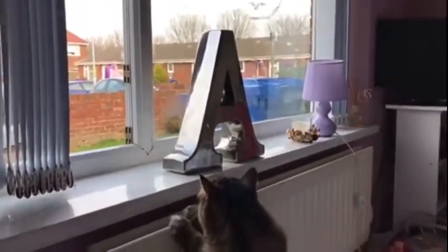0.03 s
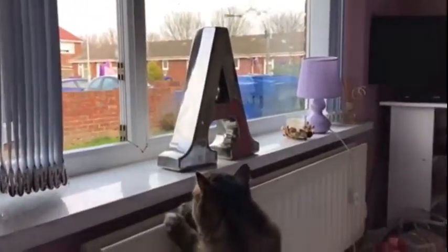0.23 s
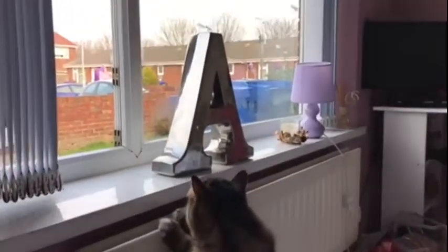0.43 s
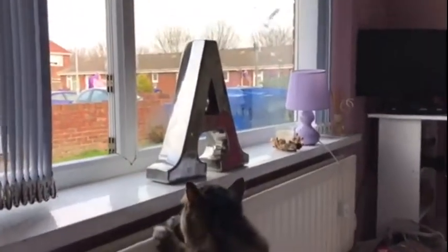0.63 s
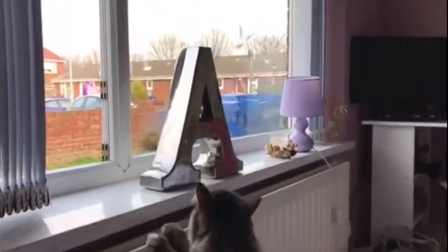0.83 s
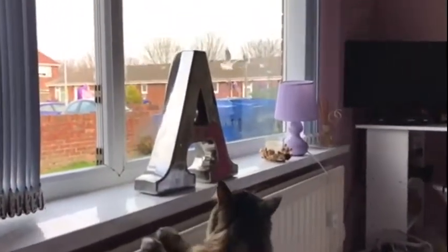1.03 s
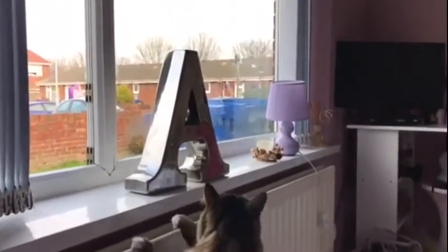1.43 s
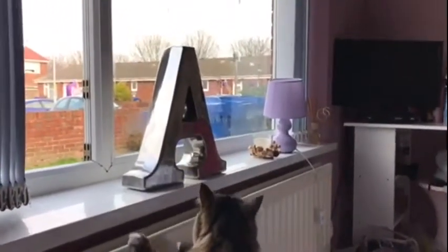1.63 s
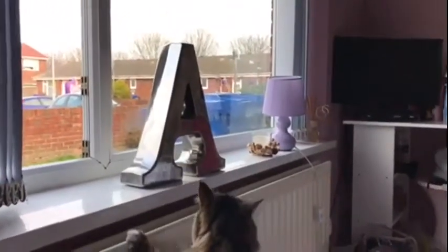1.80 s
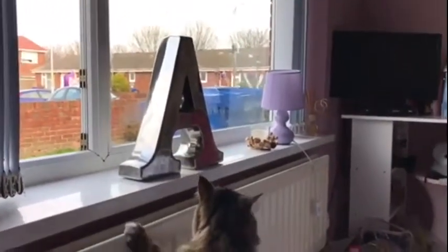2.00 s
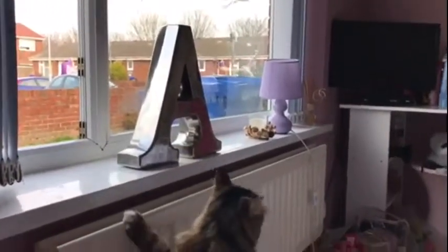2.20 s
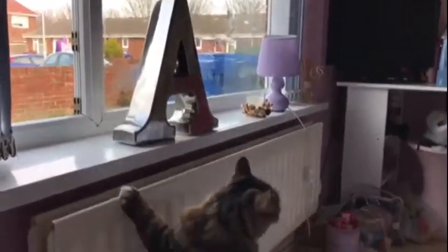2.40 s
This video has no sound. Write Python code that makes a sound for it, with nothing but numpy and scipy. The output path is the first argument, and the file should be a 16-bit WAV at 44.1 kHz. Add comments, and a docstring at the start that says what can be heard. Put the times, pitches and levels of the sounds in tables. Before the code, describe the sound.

Gull calls come through the window of a quiet room: one brief high cry, then a second bird's seven loud, falling yelps, each after a short rasping gasp. They echo along the street over faint hiss, the last three cracking.

```python
"""From a quiet room, over a low rumble and faint hiss, a gull's high cry dies away outside the window.
House fronts echo every call. Then another gull gives seven loud yelps, each after a short rasping gasp.
Each yelp starts thin, opens up as the pitch sags and ends in a rough plunge.
In the last three the voice breaks into half-pitch tones; the gasp before the final one ends in a squeak."""
import sys
import numpy as np
from scipy import signal
from scipy.fft import rfft, irfft
from scipy.io import wavfile

SR = 44100
rng = np.random.default_rng(int(sys.argv[2]) if len(sys.argv) > 2 else 0)


def to_wav(sig):
    """Store sig (one row per channel, or 1-D mono) as 16-bit WAV at the path in sys.argv[1].

    Samples outside -1..1 are clipped; the rate is SR.
    """
    pcm = np.clip(np.atleast_2d(sig), -1, 1) * 32767
    pcm = np.round(pcm).astype(np.int16)
    wavfile.write(sys.argv[1], SR, pcm.T)  # frames by channels


N = 112454
LEAD = SR // 4   # extra samples, so that the first cry can begin before time zero
T = np.arange(-LEAD, N) / SR
HZ = np.fft.rfftfreq(len(T), 1 / SR)

# Tone colour of the background hiss: frequency_hz, gain_db
HISS_COLOUR = [(15, -53), (40, -0.5), (68, -5), (100, -4), (170, -6.5), (350, -15), (700, -16.5),
               (1500, -16.5), (3000, -24), (5000, -31), (10000, -36.5), (15500, -34.5)]
# The first gull's two notes: start_s, end_s, pitch_hz, gain_db, gain_per_overtone_db
CRY_NOTES = [(-.12, .012, 1875, 0, 0), (.135, .18, 1910, -13, -14)]
# The tones in each of those notes: pitch_multiple, level_db
CRY_TONES = [(.5, -48), (1, -38), (2, -43.5), (3, -59), (4, -68.5), (5, -74)]
# Echoes off the house fronts: delay_s, gain_db
HOUSE_ECHOES = [(0.022, -11.5), (.041, -10), (.066, -17.5), (.23, -23.5)]
# Tone colour of the street's fading echo: frequency_hz, gain_db
ECHO_COLOUR = [(500, 4.5), (1300, -2), (2800, 4.5), (4500, 3), (8000, -3), (14000, 15)]
# One gasp before each yelp: start_s, length_s, level_db
GASP_TIMES = [(0.114, 0.0274, -46.5), (0.424, 0.0323, -46), (0.734, 0.0369, -46.5), (1.048, 0.0294, -45.5),
              (1.365, 0.02685, -45.5), (1.705, 0.0363, -47.5), (2.078, 0.0252, -46.5)]
# Tone colour of the gasps: frequency_hz, gain_db
BREATH_COLOUR = [(200, -34), (470, -8), (700, -14.5), (900, -3.5), (1100, 6), (1500, -1.5), (1750, -28),
                 (2050, -3.5), (2350, -18), (2800, -1.5), (3200, -18.5), (3650, -11.5), (4500, -34),
                 (9000, -46.5), (13000, -73)]
# One row per yelp: start_s, opening_s, drop_s, end_s, top_pitch_hz, climb_hz_per_s, drop_hz,
# level_db, thin_start_db, octave_db, treble_db, throat_tuning_ratio, rasp_db
YELP_NOTES = [(0.209, 0.239, 0.3017, 0.32175, 1430, 502.5, 325, -29.5, -5.5, -4.5, -6.5, 0.9524, -15),
              (0.49, 0.545, 0.6141, 0.6407, 1418, 920, 335.8, -33, -4.5, -0.5, -3.5, 1.0105, -21.5),
              (0.801, 0.85, 0.9164, 0.9419, 1420, 906.5, 342, -32.5, -6.5, 0.5, -0.5, 1.0246, -25),
              (1.111, 1.158, 1.2253, 1.2503, 1417, 905, 331.3, -31.5, -5.5, -2, -0.5, 0.9925, -27.5),
              (1.426, 1.469, 1.539, 1.5853, 1419, 324.5, 130.3, -34, -7, 0, 0.5, 1.0237, -21.5),
              (1.752, 1.809, 1.890, 1.925, 1480, 53, 141.2, -38, -2, 3, 2.5, 1.0378, -18),
              (2.129, 2.184, 2.264, 2.3027, 1485, -52, 149.8, -37.5, -1, 3, 8, 1.0581, -20)]
# How throat and beak shape the main tones: frequency_hz, gain_db
THROAT_COLOUR = [(900, -11), (1150, 5), (1420, -3), (1650, -12.5), (2000, -23.5), (2550, -1), (2800, 1.5),
                 (3400, -12.5), (3950, -13.5), (4350, -37), (4900, -31.5), (5450, -33), (6000, -36.5),
                 (6700, -34), (7250, -31), (7850, -38.5), (9200, -38), (12500, -55.5)]
# Tone colour of the voice while it is thin: pitch_multiple, gain_db
THIN_VOICE = [(1, 0.5), (2, -5), (3, -2), (4, 1), (5, -6.5), (6, -10)]
# Tone colour of the rasp that ends a yelp: frequency_hz, gain_db
RASP_COLOUR = [(600, -12.5), (1050, 8.5), (1700, -17), (2600, 3.5), (3800, -4), (4450, -20), (5100, -14.5),
               (6500, -31), (12000, -40)]
# Where the voice breaks to half pitch: start_s, length_s, half_tones_db, main_tones_db
VOICE_BREAKS = [(1.515, .05, -8.5, -10), (1.832, .08, -3, -0.5), (2.224, .06, -4, -6)]
# How throat and beak shape the half-pitch tones: frequency_hz, gain_db
HALF_TONE_COLOUR = [(650, -14), (1980, -10.5), (3250, -7.5), (4450, -19), (5600, -31), (9000, -38.5),
                    (14000, -49.5)]
# The tones in the squeak: pitch_multiple, level_db
SQUEAK_TONES = [(1, -43.5), (2, -39), (2.5, -54), (3, -53), (4, -65)]

ATTACK_S, OPEN_S, DROP_S, RELEASE_S, BREAK_S = 0.01394, 0.01381, 0.021, 0.02288, 0.019
SETTLED_HZ, SETTLE_SHARE = 1408.8, 0.5494   # the pitch steps towards this as the voice opens
SAG_HZ, SAG_POWER = 148.63, 0.7057   # then it sags, quickly at first
JITTER, BREAK_JITTER = 0.0018, 0.00485   # pitch wobble, and the extra in a break
SWELL_DB_PER_S, FADE_DB = 76, -2.5   # growth before the opening, loss by the drop
CATCH_SHARE, CATCH_LEAD_S, CATCH_S = 0.402, 0.001, 0.0089   # the voice falters just before it opens
BRIGHTEN_DB_PER_S, BLOOM_DB = 111, -5.5   # per harmonic above the 2nd and the 5th: high ones come late
FLICKER_DB, DROP_OVERTONE_DB = 3.5, -15   # upper harmonics flicker; overtones fade in the drop
RASP_SHARE, HALF_ROUGHNESS = 0.685, 0.145   # rasp's share of the ending; flutter depth of half tones


def from_db(db):
    """Turn decibels into a number to multiply by."""
    return 10 ** (np.asarray(db) / 20)


def at_hz(colour, hz):
    """Look up a tone colour's gain at the given frequencies."""
    f, db = np.transpose(colour)
    return from_db(np.interp(np.log(np.maximum(hz, 1)), np.log(f), db))


def noise(gains):
    """Noise of strength 1, shaped by a gain for each frequency."""
    x = irfft(rfft(rng.standard_normal(len(T))) * gains, len(T))
    return x / x.std()


def flutter(hz):
    """Random wavering, mostly slower than the given rate."""
    return noise(1 / (1 + (HZ / hz) ** 2))


def ramp(x):
    """Smooth step from 0 to 1."""
    return np.sin(np.pi / 2 * np.clip(x, 0, 1)) ** 2


def tones(table, hz, tilt_db=0):
    """Add up tones on whole multiples (harmonics) and half multiples of a pitch."""
    phase = 2 * np.pi * np.cumsum(hz) / SR
    return sum(from_db(db + tilt_db * max(k - 1, 0)) * np.sin(k * phase) for k, db in table)


def background(rumble_hz=67.2, width_hz=3.8):
    """A low rumble and faint hiss, heard all the way through."""
    rumble = noise(1 / (1 + ((HZ - rumble_hz) / width_hz) ** 2))
    hiss = noise(at_hz(HISS_COLOUR, HZ))
    return from_db(-64) * rumble + from_db(-62.5) * hiss


def high_cry():
    """The first gull ends a high, wavering cry and adds a faint second note."""
    waver = 1 + 0.02654 * flutter(hz=200)
    out = np.zeros(len(T))
    for start, end, hz, db, tilt_db in CRY_NOTES:
        level = from_db(db) * ramp((T - start) / ATTACK_S) * ramp((end - T) / RELEASE_S)
        out += level * tones(CRY_TONES, hz * waver, tilt_db)
    return out


def street_echoes(calls, build_s=0.0053):
    """Calls arrive directly, then bounce off houses: a few echoes, a short tail and a long faint one."""
    t = np.arange(SR) / SR
    colour = at_hz(ECHO_COLOUR, np.fft.rfftfreq(SR, 1 / SR))
    out = calls + sum(from_db(db) * np.interp(T - delay, T, calls, left=0) for delay, db in HOUSE_ECHOES)
    for fade_s, db in ((0.445, -8.5), (2.057, -21)):
        tail = rng.standard_normal(SR) * from_db(-60 * t / fade_s) * ramp(t / build_s)
        tail = irfft(rfft(tail / np.linalg.norm(tail)) * colour)
        out += from_db(db) * signal.fftconvolve(calls, tail)[:len(T)]
    return out


def gasps(rise_s=0.011, fall_s=0.01):
    """The second gull snatches air before each yelp: a short burst of noise in its throat."""
    swell = sum(from_db(db) * ramp((T - start) / rise_s) * ramp((start + length - T) / fall_s + .5)
                for start, length, db in GASP_TIMES)
    return swell * noise(at_hz(BREATH_COLOUR, HZ))


def yelps(tone_count=19):
    """The voice slides through the pitches at which the throat rings, and turns rough as it drops."""
    out = np.zeros(len(T))
    waver = flutter(hz=162)
    flicker = [flutter(hz=30) for _ in range(tone_count)]
    grit = [flutter(hz=208.4) for _ in range(tone_count)]
    broken, half_gain, main_db = voice_breaks()
    for (start, opening, drop, end, top_hz, climb, drop_hz,
         db, thin_db, octave_db, treble_db, tuning, rasp_db) in YELP_NOTES:
        on = (T > start) & (T < end)
        t = T[on]
        until_open_s = np.maximum(opening - t, 0)
        thin = 1 - ramp((t - opening) / OPEN_S)
        progress = np.clip((t - opening) / (drop - opening), 0, 1)
        dropped = ramp((t - drop) / DROP_S)

        step_hz = SETTLE_SHARE * (top_hz - SETTLED_HZ) * (1 - thin)
        hz = top_hz - step_hz - climb * until_open_s - SAG_HZ * progress ** SAG_POWER - drop_hz * dropped
        wobble = 1 + (JITTER + BREAK_JITTER * broken[on]) * waver[on]
        phase = 2 * np.pi * np.cumsum(hz * wobble) / SR

        catch = CATCH_SHARE * np.exp(-.5 * ((t - opening + CATCH_LEAD_S) / CATCH_S) ** 2)
        level = from_db(db + thin_db * (thin + catch) - SWELL_DB_PER_S * until_open_s + FADE_DB * progress)
        level *= ramp((t - start) / ATTACK_S) * ramp((end - t) / RELEASE_S)
        rasp = from_db(rasp_db) * np.exp(-((t - drop - DROP_S / 2) / (RASP_SHARE * (end - drop))) ** 2)

        for i, rough in enumerate(grit):
            k = (i + 1) / 2   # multiple of the pitch: 0.5, 1, 1.5, ...
            lookup_hz = k * hz / tuning
            colour_db = np.interp(k, [1, 2, 3], [0, octave_db, treble_db])
            colour_db += np.interp(k, *np.transpose(THIN_VOICE)) * thin
            colour_db -= np.clip(k - 2, 0, 4) * BRIGHTEN_DB_PER_S * until_open_s
            colour_db += np.clip(k - 5, 0, 3) * BLOOM_DB * (1 - progress)
            colour_db += (k > 3) * FLICKER_DB * flicker[i][on]
            if k.is_integer():   # a main tone
                loss_db = main_db[on] + (k > 1) * DROP_OVERTONE_DB * dropped
                tone = at_hz(THROAT_COLOUR, lookup_hz) * from_db(loss_db)
            else:   # a half-pitch tone, heard in a break
                tone = at_hz(HALF_TONE_COLOUR, lookup_hz) * half_gain[on] * (1 - dropped)
                tone *= 1 + HALF_ROUGHNESS * rough[on]
            hoarse = rasp * rough[on] * at_hz(RASP_COLOUR, lookup_hz)
            out[on] += np.sqrt(2) * level * from_db(colour_db) * (tone + hoarse) * np.sin(k * phase)
    return out


def voice_breaks():
    """When the voice breaks, half-pitch tones come in and the main tones weaken."""
    broken, half_gain, main_db = np.zeros((3, len(T)))
    for start, length, half_db, loss_db in VOICE_BREAKS:
        gate = ramp((T - start) / BREAK_S) * ramp((start + length - T) / BREAK_S + 1)
        broken += gate
        half_gain += gate * from_db(half_db)
        main_db += gate * loss_db
    return broken, half_gain, main_db


def squeak(time_s=2.105, width_s=0.00268, pitch_hz=1509):
    """The last gasp catches the voice and ends in a tiny blip."""
    blip = np.exp(-.5 * ((T - time_s) / width_s) ** 2)
    return blip * tones(SQUEAK_TONES, np.full(len(T), pitch_hz))


def scene():
    """Both gulls in the echoing street, over the background."""
    calls = yelps() + gasps() + squeak() + high_cry()
    return (street_echoes(calls) + background())[None, LEAD:]


def record(dry, cutoff_hz=15700):
    """Cut away the very highest treble with a steep filter."""
    return signal.sosfilt(signal.ellip(10, .1, 70, cutoff_hz, fs=SR, output="sos"), dry)


dry = scene()
out = record(dry)
to_wav(out)
```